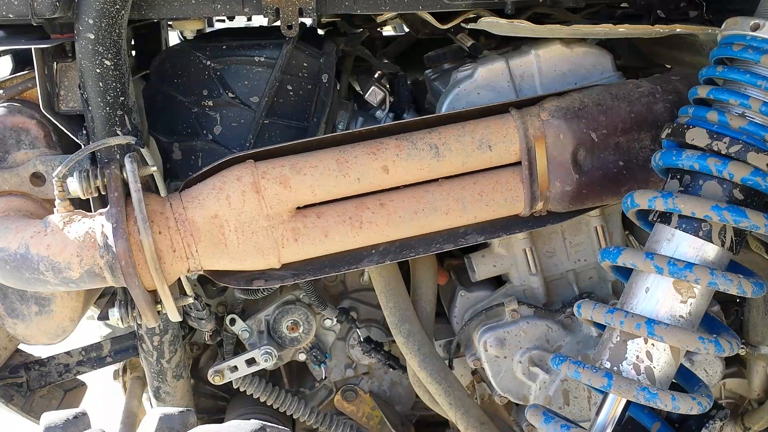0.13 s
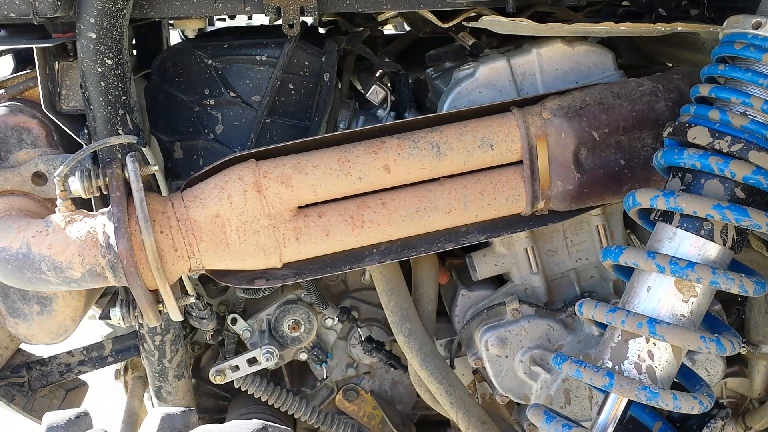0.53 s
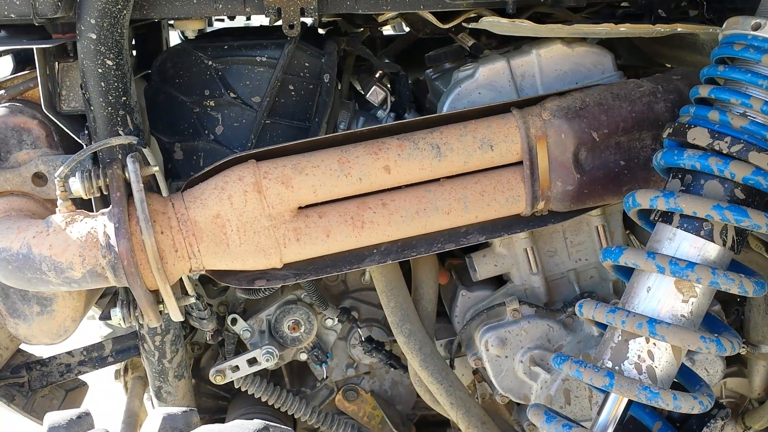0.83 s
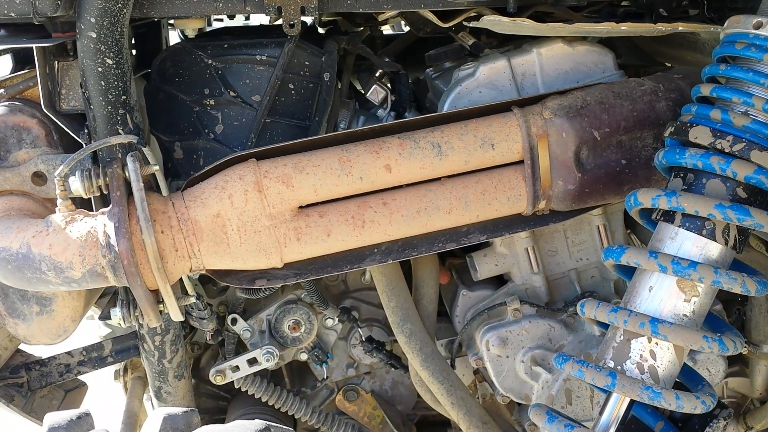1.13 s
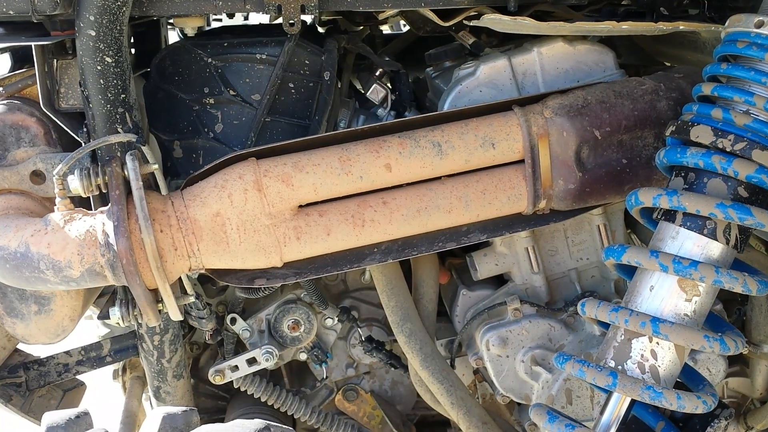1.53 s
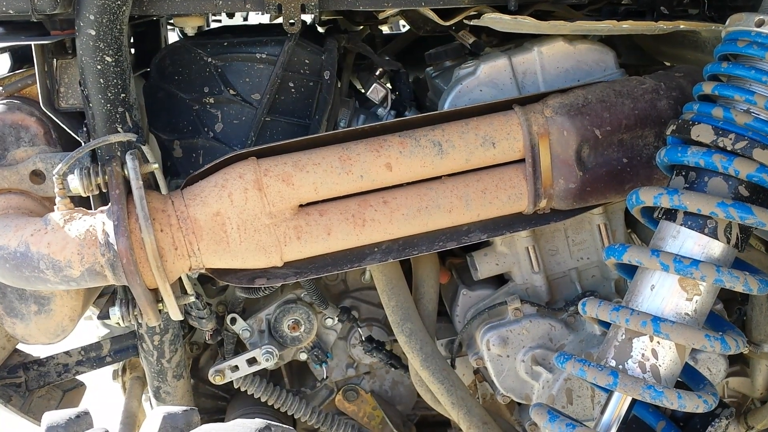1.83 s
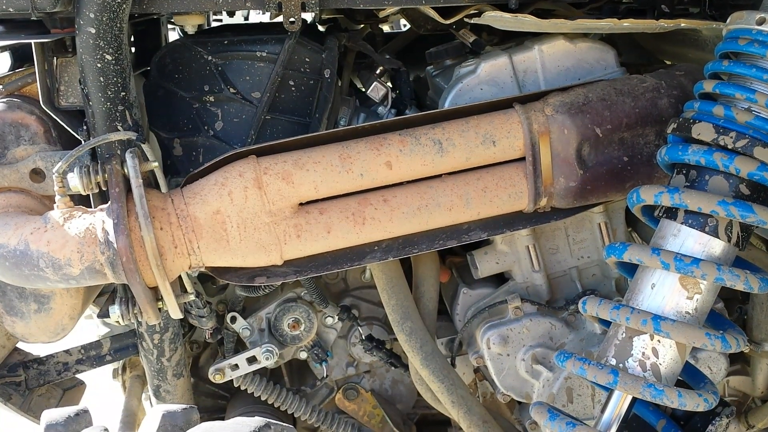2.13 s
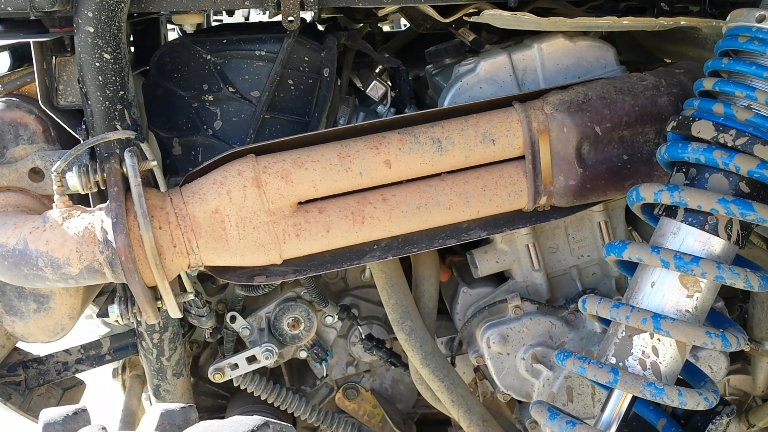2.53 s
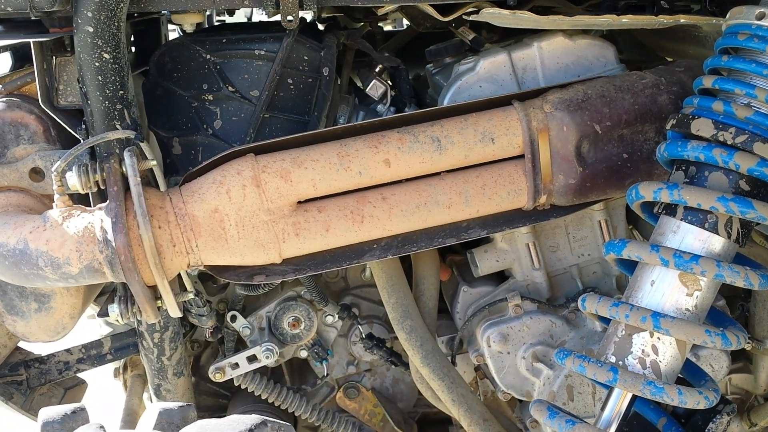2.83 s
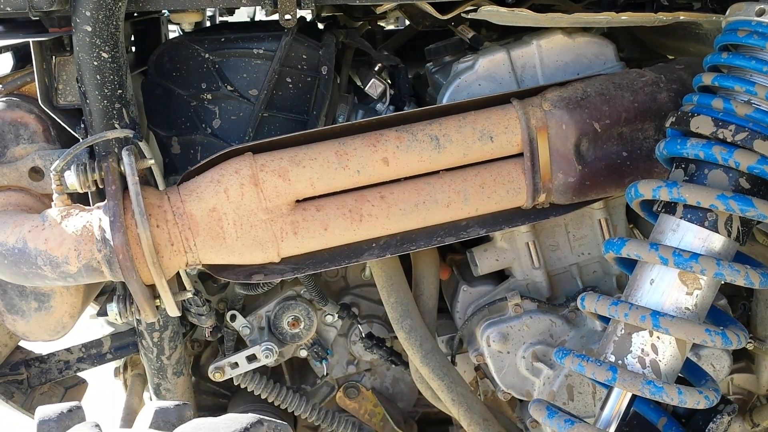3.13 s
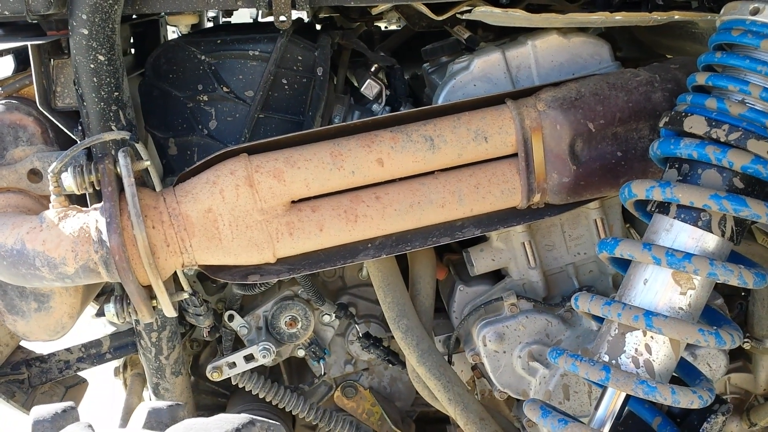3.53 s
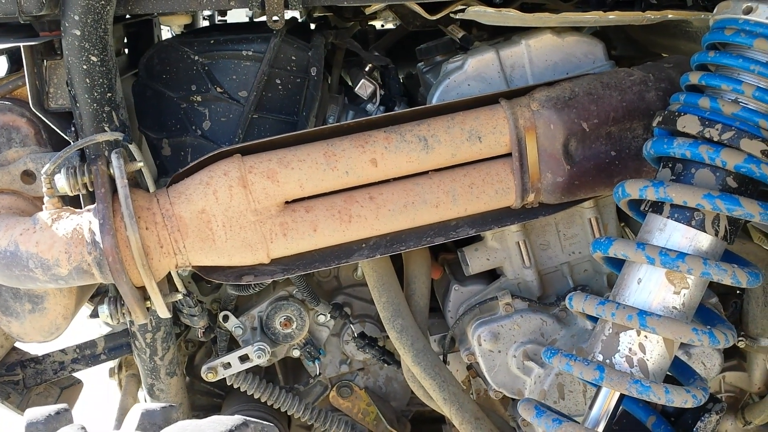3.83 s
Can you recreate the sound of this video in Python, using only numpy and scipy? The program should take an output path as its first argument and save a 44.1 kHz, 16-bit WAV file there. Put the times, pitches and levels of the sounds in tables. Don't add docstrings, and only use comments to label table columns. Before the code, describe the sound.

Off-road vehicle engine idling close up, fast regular metallic knock over a low exhaust boom

```python
import sys
import numpy as np
from scipy import signal
from scipy.fft import rfft, irfft, next_fast_len
from scipy.io import wavfile
from scipy.ndimage import uniform_filter1d

SR = 44100
rng = np.random.default_rng(int(sys.argv[2]) if len(sys.argv) > 2 else 0)


def generate_wav(sig):
    pcm = np.round(np.clip(np.atleast_2d(sig).T, -1, 1) * 32767).astype(np.int16)
    wavfile.write(sys.argv[1], SR, pcm)


def elevation(decibels):
    levels = np.asarray(decibels, float)
    return 10 ** (levels / 20)


N = 176400

# (time [s], speed [engine cycles/s])
IDLE_SPEED = [(0.4, 10.542), (0.769, 11.518), (0.863, 10.725), (1.259, 11.875), (1.308, 10.883),
              (1.584, 12.1), (1.677, 10.974), (2.029, 11.497), (2.36, 11.37), (2.36, 11.171),
              (2.649, 11.082), (3.039, 11.118), (3.067, 11.614), (3.313, 11.503), (3.4, 10.988),
              (3.556, 11.658), (4.0, 11.208)]
# (place [cycle], level [dB])
FIRINGS = [
    (-.057, 0),
    (.178, -5.9),
]
# (frequency [Hz], level [dB], t60 [s], sign [+1/-1])
PIPE_MODES = [(54.5, -18.2, .118, 1), (85.3, -6.9, .124, 1), (99.2, -2.5, .187, -1), (147, -32, .4, -1),
              (181.3, -23.5, .26, -1), (280, -36, .4, 1)]
REBOUND_TRIPS = [
    0,
    2,
    5,
    8,
    14,
]
REBOUND_DB = [0, -1, -8, -6, -15]
# (frequency [Hz], left level [dB], right level [dB], t60 [s], right lag [turns])
CASING_MODES = [(2270, -30, -15, 0.15, 0.51), (2570, -17, -6, 0.079, 0.15), (1085.6, 1, -4, 0.084, 0.18),
                (1293.6, 0, 4, 0.07, 0.2), (1380, 0, -5, 0.3, 0.033), (1408, -3, -4, .16, .04),
                (1463, -7, -7, .14, .04), (1590, -0.5, 4.5, 0.053, 0.033), (1782, 4, 2, 0.12, 0.38),
                (1976, -36, -2.5, 0.13, 0.067), (2132, -21, 1, 0.11, 0.35), (2483, -7, -9.5, 0.11, 0.16),
                (2650, -10, -18, 0.12, 0.51), (2823, -6.5, -2.5, 0.05, 0.07)]
# (frequency [Hz], level [dB/Hz])
FRAME_COLOUR = [(250, -50), (600, -1), (1200, -1), (2200, -11.5), (2900, -23), (3500, -31), (6000, -8),
                (9000, -84)]
# (frequency [Hz], level [dB], t60 [s])
COVER_MODES = [(768, -1, .1), (862, -1, .09), (810, -9, .05)]
# (place [cycle], level [dB])
COVER_TAPS = [(.6, 3), (.85, 2), (0.0185, -7.5), (.2, 0)]
# (frequency [Hz], level [dB/Hz])
HISS_COLOUR = [(1650, -1), (2800, -1.5), (3220, -11.5), (3880, -12.5), (5600, -10), (8600, -13.5),
               (9800, -24), (12000, -20), (14600, -21.5)]
# (place [cycle], level over the hiss [dB], rise [s], hold [s], t60 [s])
GEAR_BURSTS = [
    (0.46, 10, 0.0013, 0.014, 0.11),
    (0.14, 1.5, 0.0044, 0.0086, 0.17),
    (0.84, 4.5, 0.0085, 0.011, 0.16),
]
# (frequency [Hz], width [Hz], level [dB])
STEEL_RINGS = [(5000, 46, -4), (5390, 82, 2.5), (5780, 31, 2.5), (6330, 73, 2), (6817, 65, 5.5),
               (8370, 55, -7), (10360, 130, -5.5), (11900, 190, -4.5)]
# (frequency [Hz], level [dB/Hz])
WHIRR_COLOUR = [(200, -2), (330, -1.5), (606, -11.5), (850, -2.5), (1180, -5.5), (1430, -8.5), (2800, -38),
                (3400, -10.5)]
# (frequency [Hz], left minus right [dB])
LEFT_LEAN = [(300, 0.7), (1400, -.5), (3000, -4), (6000, -5), (8000, -11), (10500, -11), (12500, -14),
             (14000, -16)]
# (frequency [Hz], likeness [0-1])
PORT_LIKENESS = [(300, 0.8), (700, 0.77), (1200, 1), (2000, 0.65), (4000, 0.089), (9000, 0.15)]
# (frequency [Hz], gain [dB])
LEFT_PORT = [(8500, 0), (10500, -3), (11500, -10), (12600, -22), (15000, -22)]
TREBLE_FLOOR_DB = [-77, -64.5]


def unit(x):
    return x / np.sqrt(np.mean(x ** 2) + 1e-20)


def along(points, hz):
    f, v = np.transpose(points)
    return np.interp(np.log(hz + 1), np.log(f + 1), v)


def filtered(x, response):
    m = next_fast_len(x.shape[-1] + SR // 2)
    spectrum = rfft(x, m) * response(np.fft.rfftfreq(m, 1 / SR))
    return irfft(spectrum, m)[..., :x.shape[-1]]


def peak(f, hz, width_hz):
    return 1j * f * width_hz / (hz * hz - f * f + 1j * f * width_hz)


def closed(points):
    ends = [(points[0][0] / 2, -90), *points, (points[-1][0] * 2, -90)]
    return lambda f: elevation(along(ends, f))


def through(x, shape):
    return signal.fftconvolve(np.atleast_2d(x), np.atleast_2d(shape), axes=1)[:, :N]


def pulses(place, db=0, after_s=0, scatter_db=0, jitter_s=0):
    start_s, lag_s = 0.4, 0.016
    t = np.arange(N) / SR
    turns = np.cumsum(np.interp(t, *np.transpose(IDLE_SPEED))) / SR
    turns = turns - turns[round(start_s * SR)]
    cycles = np.arange(-2, 42)
    luck = rng.standard_normal((len(cycles), 2))
    at = np.interp(cycles + place, turns, t) + lag_s + after_s + jitter_s * luck[:, 0]
    at = np.where(cycles + place < turns[-1], at, N / SR)
    strength = elevation(db + scatter_db * luck[:, 1])
    return np.bincount(np.round(at * SR).astype(int), strength, N + SR)[:N]


def stereo(colour, size=N):
    def mix(f):
        turn = np.arccos(np.clip(along(PORT_LIKENESS, f), 0, 1)) / 2
        return colour(f) * [np.cos(turn), np.sin(turn)]

    def lean(f):
        return np.sqrt(2 / (1 + elevation(np.outer([-2, 2], along(LEFT_LEAN, f)))))

    mid, side = filtered(rng.standard_normal((2, size)), mix)
    return filtered(unit(np.array([mid + side, mid - side])), lean)


def exhaust():
    exhaust_db, rumble_db, puff_s = 0.28, -41, 0.00019
    t = np.arange(SR // 2) / SR
    ring = sum(sign * elevation(db - 60 * t / t60) * np.sin(2 * np.pi * hz * t)
               for hz, db, t60, sign in PIPE_MODES)
    puff = t[:400] * np.exp(-t[:400] / puff_s)
    fire = sum(pulses(place, db, scatter_db=0.5) for place, db in FIRINGS)
    boom = through(through(fire, puff / puff.sum()), ring) * elevation([[0.2], [-0.2]])
    rumble = unit(filtered(rng.standard_normal((2, N)), lambda f: abs(peak(f, 90, 90)) ** 2))
    return elevation(exhaust_db) * boom + elevation(rumble_db) * rumble


def knock():
    place, pipe_trip_s = 0.438, 0.002836
    casing_db, frame_db, thud_db, chatter_db = -18.5, -26, -39.5, -28.5
    frame_t60_s = 0.12
    t = np.arange(SR // 2) / SR
    blow = pulses(place, scatter_db=1)
    rebounds = sum(pulses(place, db, trips * pipe_trip_s, scatter_db=0.8, jitter_s=0.00002)
                   for trips, db in zip(REBOUND_TRIPS, REBOUND_DB))
    blows = rebounds * uniform_filter1d(blow, size=3500) * 3500
    ring = 0
    for hz, left_db, right_db, t60, lag in CASING_MODES:
        decay = elevation(np.array([[left_db], [right_db]]) - 60 * t / t60)
        ring = ring + decay * np.sin(2 * np.pi * (hz * t - np.array([[0], [lag]])))
    ring = ring * (1 - np.exp(-t / 0.0005))
    frame = stereo(closed(FRAME_COLOUR), size=len(t)) * elevation(-60 * t / frame_t60_s)
    thud = unit(filtered(blows, lambda f: peak(f, 323, 440) ** 2))
    chatter = unit(through(rng.standard_normal(N), ring))
    struck = through(blows, elevation(casing_db) * ring + elevation(frame_db) * frame)
    return struck + elevation(thud_db) * thud + elevation(chatter_db) * chatter


def cover():
    cover_db, rise_s = -23.5, 0.0075
    t = np.arange(SR // 3) / SR
    taps = sum(pulses(place, db, scatter_db=3.5, jitter_s=0.000738) for place, db in COVER_TAPS)
    ring = sum(elevation(db - 60 * t / t60) * np.sin(2 * np.pi * hz * t) for hz, db, t60 in COVER_MODES)
    return elevation(cover_db) * through(taps, ring * (1 - np.exp(-t / rise_s)))


def valve_gear():
    hiss_db, whirr_db, flutter_db = -23, -30, 1.24
    t = np.arange(SR // 5) / SR
    swell = 1
    for place, db, rise, hold, t60 in GEAR_BURSTS:
        burst = (1 - np.exp(-t / rise)) * elevation(-60 * np.maximum(t - hold, 0) / t60)
        swell = swell + through(pulses(place, db, scatter_db=1.5), burst)

    def steel(f):
        rings = sum(elevation(db) * abs(peak(f, hz, width)) ** 2 for hz, width, db in STEEL_RINGS)
        return closed(HISS_COLOUR)(f) * (1 + rings)

    flutter = elevation(flutter_db * unit(uniform_filter1d(rng.standard_normal(N), size=60)))
    hiss = unit(swell) * stereo(steel) * flutter
    return elevation(hiss_db) * hiss + elevation(whirr_db) * stereo(closed(WHIRR_COLOUR))


def scene():
    return exhaust() + knock() + cover() + valve_gear()


def drop_weak_treble(x):
    hz, _, z = signal.stft(x, SR, nperseg=2048)
    power = uniform_filter1d(abs(z) ** 2, size=3, axis=1)
    level = np.sqrt(uniform_filter1d(power, size=2, axis=2))
    luck = uniform_filter1d(rng.standard_normal(z.shape[1:]), size=4)
    luck = elevation(2.5 * unit(uniform_filter1d(luck, size=30, axis=0)))
    keep = (level > elevation(TREBLE_FLOOR_DB)[:, None, None] * luck) | (hz[:, None] < 9400)
    return signal.istft(z * keep, SR, nperseg=2048)[1][:, :N]


def low_pass(x):
    return signal.sosfilt(signal.butter(12, 14700, fs=SR, output="sos"), x)


def record(dry):
    ceiling, silent_until_s, fade_from_s, fade_s = 0.96, 0.388, 0.37, 0.28
    t = np.arange(N) / SR
    x = dry / (1 + abs(dry / ceiling) ** 8) ** (1 / 8)
    x = filtered(x, lambda f: elevation(np.outer([1, 0], along(LEFT_PORT, f))))
    x = drop_weak_treble(x)
    fade = (t > silent_until_s) * np.clip((t - fade_from_s) / fade_s, 0, 1)
    return low_pass(x * fade)


dry = scene()
out = record(dry)
generate_wav(out)
```